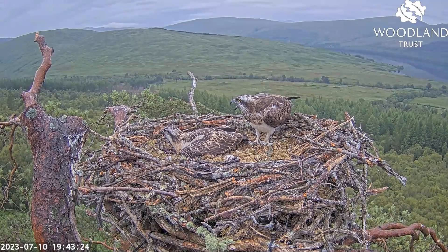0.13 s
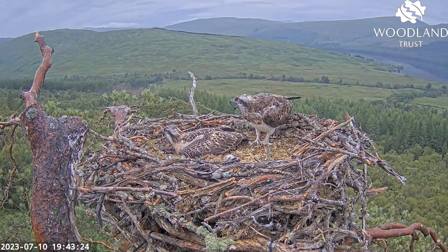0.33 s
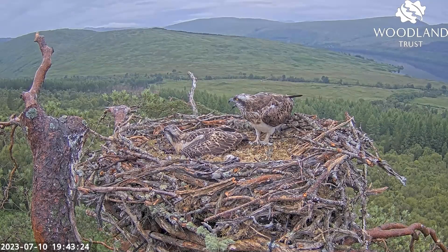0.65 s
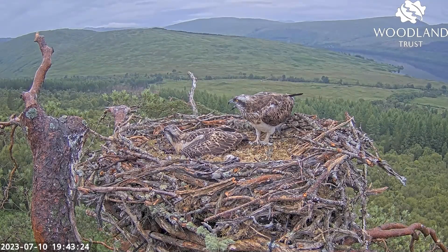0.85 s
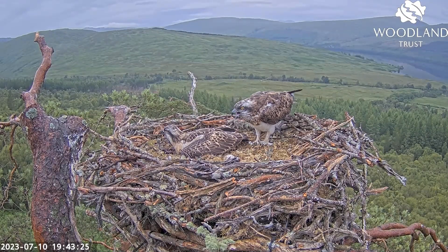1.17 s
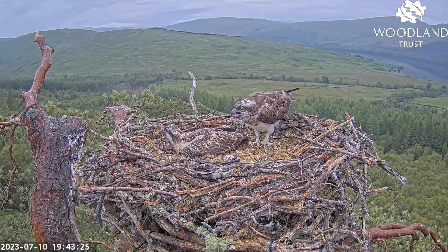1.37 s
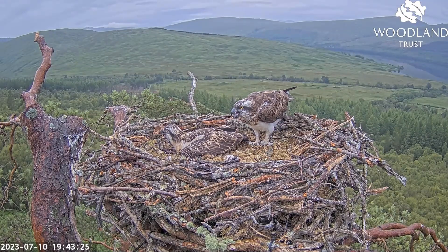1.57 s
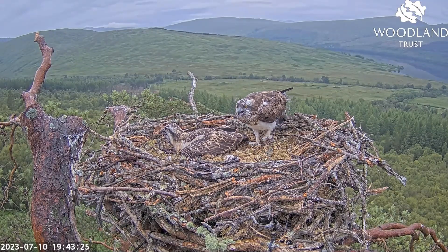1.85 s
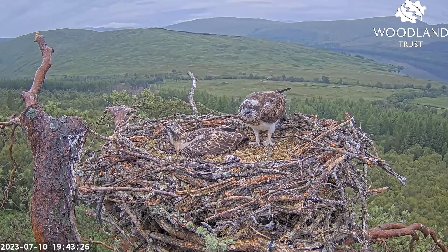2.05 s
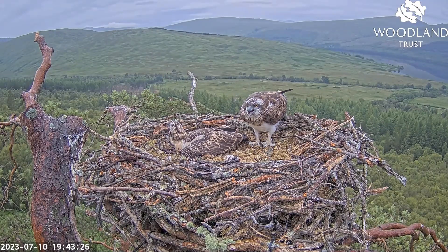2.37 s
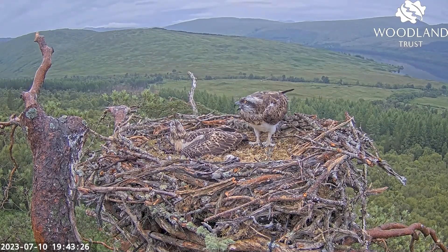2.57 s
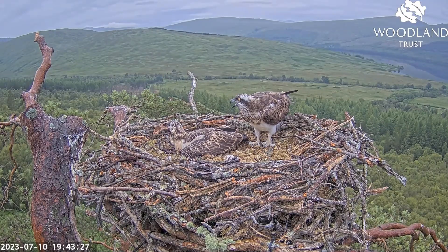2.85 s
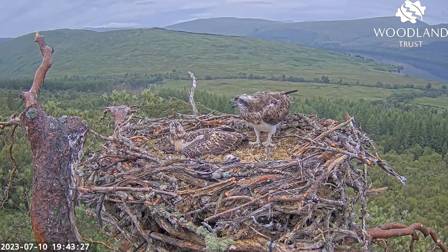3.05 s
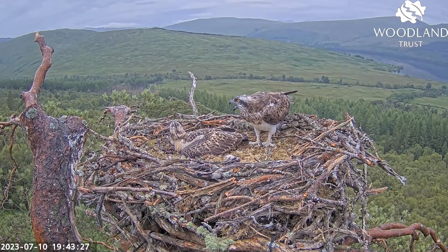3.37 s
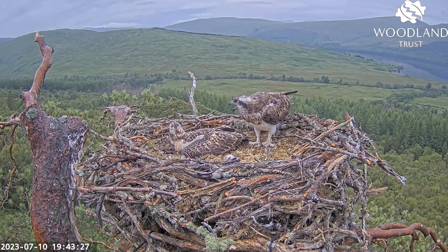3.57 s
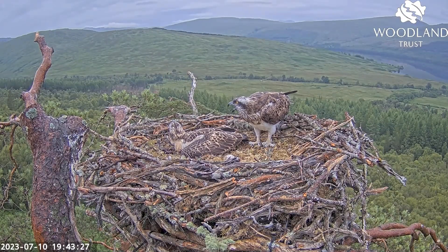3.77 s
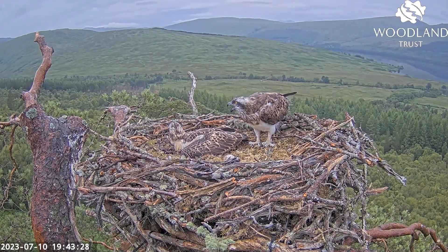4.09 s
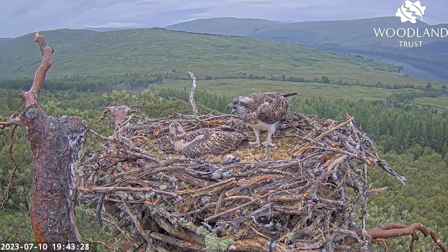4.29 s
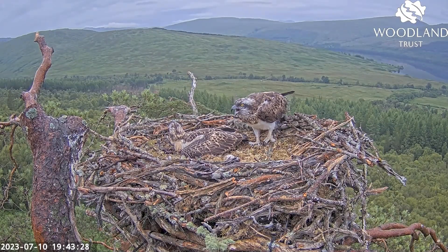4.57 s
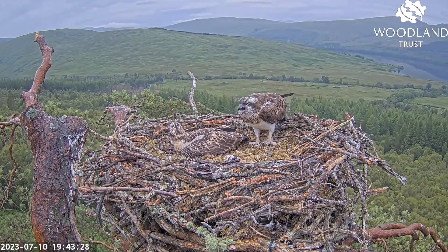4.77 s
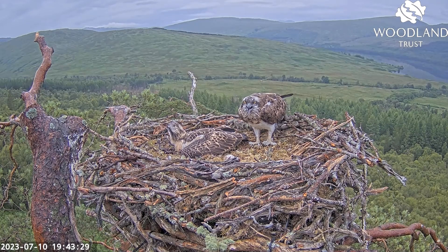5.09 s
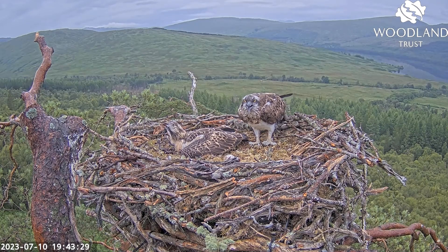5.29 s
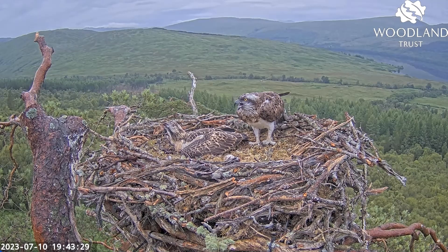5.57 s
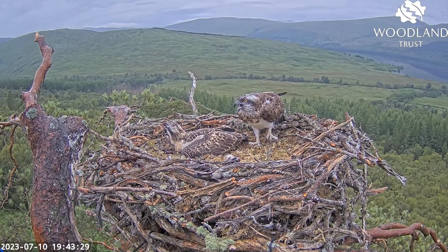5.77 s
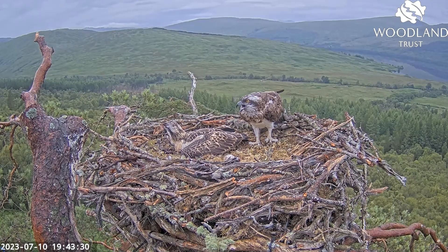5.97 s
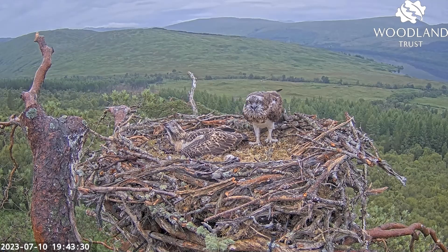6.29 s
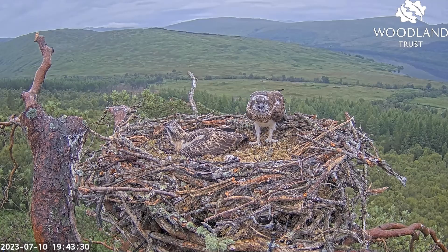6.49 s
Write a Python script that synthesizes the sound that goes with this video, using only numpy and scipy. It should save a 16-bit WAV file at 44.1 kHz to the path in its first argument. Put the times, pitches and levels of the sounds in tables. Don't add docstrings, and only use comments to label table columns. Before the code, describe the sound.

An osprey standing on a big stick nest calls throughout, a fast even series of short, hoarse, whistled chirps, about five per second. They start moderate, swell and rise, drop back softer and lower around the middle, then return louder and higher. Very quiet breeze and faint hiss lie beneath. Close, mostly dry outdoor sound through a slightly boxy, band-limited nest microphone.

```python
import sys
import numpy as np
from scipy import signal
from scipy.fft import rfft, irfft
from scipy.io import wavfile
from scipy.ndimage import uniform_filter1d, minimum_filter1d

SR = 44100
rng = np.random.default_rng(int(sys.argv[2]) if len(sys.argv) > 2 else 0)


def ratio_of_db(decibels):
    return 10 ** (np.asarray(decibels, float) / 20)


def int16_out(signal):
    q = np.round(np.clip(np.atleast_2d(signal).T, -1, 1) * 32767)
    wavfile.write(sys.argv[1], SR, q.astype(np.int16))


N = 292824


def rms_one(x):
    return x / np.sqrt(np.mean(x ** 2) + 1e-20)


def at_hz(points, hz):
    points = np.array(points)
    return np.interp(np.log(hz), np.log(points[:, 0]), points[:, 1])


def drift(hz):
    r = np.exp(-2 * np.pi * hz / SR)
    return rms_one(signal.lfilter([1], [1, -2 * r, r * r], rng.standard_normal(N)))


def span(start_s, end_s):
    part = slice(max(int(start_s * SR), 0), min(int(end_s * SR), N))
    return part, np.arange(part.start, max(part.stop, part.start)) / SR


def resonate(x, modes):
    out = 0
    for k, (hz, width_hz, level_db) in enumerate(modes):
        r = np.exp(-np.pi * 1.5 * width_hz / SR)
        section = [1, 0, -1, 1, -2 * r * np.cos(2 * np.pi * hz / SR), r * r]
        ring = rms_one(signal.sosfilt([section, section], x))
        out = out + (-1) ** k * ratio_of_db(level_db) * ring
    return rms_one(out)


# frequency in Hz, density in dB per Hz.
BREEZE_SPECTRUM = [(30, -32.5), (120, -6), (400, -7), (750, -6.5), (1100, 1.5), (1500, -5), (2500, -0.5),
                   (4000, -9), (8000, -14.5), (10000, -29)]


def breeze():
    colour = ratio_of_db(at_hz(BREEZE_SPECTRUM, np.arange(1, N // 2 + 2) * SR / N))
    noise = irfft(rfft(rng.standard_normal(N)) * colour, N)
    return ratio_of_db(-54.5 + .5 * drift(1.1)) * rms_one(noise)


def scatter(x, t60_s, delay_s):
    t = np.arange(int(.6 * SR)) / SR
    tail = rng.standard_normal(len(t)) * ratio_of_db(-60 * t / t60_s) * (t > delay_s)
    return signal.fftconvolve(x, tail / np.sqrt(np.sum(tail ** 2)))[:N]


def snap():
    t = np.arange(N) / SR - 5
    bell = np.exp(-.5 * (t / 0.00079) ** 2)
    return ratio_of_db(-26) * bell * np.sin(2 * np.pi * 3600 * t)


# start in seconds, length in seconds, jump to the high voice
# in seconds after start, top pitch in Hz, effort in dB.
SWELLING_CHIRPS = [(0.019, 0.1, 0.024, 3670, -32), (0.202, 0.097, 0.023, 3670, -33),
                   (0.385, 0.11, 0.023, 3630, -32), (0.577, 0.1, .017, 3650, -32),
                   (0.769, 0.11, 0.02, 3620, -30.5), (0.957, 0.11, 0.022, 3688, -32),
                   (1.149, 0.11, 0.023, 3750, -29), (1.344, 0.1, 0.02, 3813, -27.5),
                   (1.544, .110, 0.023, 3820, -27), (1.743, 0.11, 0.027, 3874, -28.5),
                   (1.943, 0.109, 0.03, 3892, -26), (2.141, 0.11, 0.032, 3878, -27.5),
                   (2.339, 0.11, 0.023, 3909, -27.5), (2.558, 0.11, 0.034, 3792, -29),
                   (2.776, 0.11, 0.018, 3707, -28.5)]
SUBDUED_CHIRPS = [
    (2.986, 0.12, .030, 3585, -35),
    (3.179, .120, .018, 3555, -33),
    (3.374, .120, 0.028, 3600, -33.5),
    (3.575, 0.11, .020, 3610, -32.5),
    (3.778, .120, 0.017, 3633, -33.5),
    (3.975, .120, .017, 3636, -33.5),
    (4.175, 0.12, .017, 3680, -31),
]
URGENT_CHIRPS = [(4.375, .120, 0.026, 3784, -29.5), (4.570, .128, .021, 3900, -27.5),
                 (4.774, 0.12, .024, 3944, -27.5), (4.981, 0.1, .023, 4079, -26.5),
                 (5.189, 0.1, 0.028, 4063, -24.5), (5.410, .113, 0.039, 3974, -25.5),
                 (5.623, 0.12, .029, 3868, -27), (5.825, 0.11, 0.022, 3870, -25),
                 (6.021, 0.11, 0.028, 3853, -27.5), (6.223, 0.12, .023, 3898, -25),
                 (6.426, 0.12, 0.021, 4111, -26.5), (6.630, .120, .023, 3996, -29.5)]
CHIRPS = SWELLING_CHIRPS + SUBDUED_CHIRPS + URGENT_CHIRPS
USUAL_HZ, USUAL_DB = 3800, -28
GRIP, GAPE, PUSH, SLACK = 1, 2, 3, 4

# time in seconds, grip of the high voice in dB, gape of the beak in dB,
# push of the low voice in dB, slack of the pitch as a factor.
BIRD_STATE = [(0, -11.5, -0.5, 2, .9), (0.45, -9, -1, 0, 1.0), (0.85, -8, 0, -0.5, .8),
              (1.0, -9, -0.5, -1, .9), (1.2, 6.5, 1.5, 1, .6), (1.8, -4, 2.5, 2.5, 1.2),
              (2.2, 6, 4.5, -1.5, .9), (2.6, 3.5, 3, -3.5, 1.2), (2.8, -5, -1, 3.5, 1.1),
              (3.2, -22.5, -0.5, 0.5, .8), (4.25, -19.5, -0.5, 1, .7), (4.4, 1.5, 2.5, 4, 1.0),
              (5.0, -9, 5.5, 4.5, .5), (5.45, -5, 2.5, -2, 1.0), (5.7, -1.5, -1.5, -2, .9),
              (5.95, -4, 0.5, 1.5, 0.64), (6.25, 4.5, 1, 1.5, 1.2), (6.6, -4.5, 2.5, -5, .9)]


def state(column):
    table = np.transpose(BIRD_STATE)
    chirp_s = np.transpose(CHIRPS)[0] + .04
    return np.interp(chirp_s, table[0], table[column])


def openings():
    start_s, _, jump_s, hz, _ = np.transpose(CHIRPS)
    top_hz = 0.778 * hz + 5500 * (jump_s - .022)
    first_db = -19 - 19.5 * np.abs(hz - 3798) / 1e3 + state(PUSH)
    octave_db = -27 + 28 * (hz - USUAL_HZ) / 1e3 + state(GAPE)
    return np.transpose([start_s, start_s + jump_s, 0.71 * hz, top_hz, first_db, octave_db])


# start in seconds, level in dB.
CLOSING_WHISTLES = [(1.419, -35.5), (1.634, -22), (1.832, -23), (2.035, -28.5), (2.239, -26.5),
                    (2.428, -29), (2.660, -25), (2.868, -22.5), (3.094, -32.5), (3.285, -36.5),
                    (3.479, -37), (4.480, -33), (4.684, -23.5), (4.881, -27), (5.074, -23), (5.279, -26),
                    (5.512, -22.5), (5.724, -24.5), (5.925, -24.5), (6.333, -30), (6.532, -32.5)]


def closings():
    start_s, length_s, _, hz, _ = np.transpose(CHIRPS)
    s, db = np.transpose(CLOSING_WHISTLES)
    own = np.searchsorted(start_s, s) - 1
    over_db = db + 25
    from_hz = (0.755 + .004 * over_db) * hz[own]
    octave_db = -35 + 1.25 * over_db + 40 * (hz[own] - USUAL_HZ) / 1e3
    end_s = start_s[own] + length_s[own] - .0015
    return np.transpose([s, end_s, from_hz, 0.685 * hz[own], db, octave_db])


# share of the note, sag under top pitch as a share, fundamental in dB,
# share of the grip heard, octave in dB.
HIGH_ARCH = [(0, 0.036, -35.5, 0.5, -34.5), (.3, 0.054, -33, 0.95, -39.5), (.55, 0.018, -33, .4, -38.5),
             (.78, .001, -34.5, 0.026, -34), (1, 0.055, -39, 0.51, -40)]


def middles():
    along, sag, first_db, by_grip, octave_db = np.transpose(HIGH_ARCH)
    out, controls = [], np.transpose([state(GRIP), state(GAPE), state(SLACK)])
    for (start, length, jump, hz, effort_db), (grip_db, gape_db, slack) in zip(CHIRPS, controls):
        yields = [s - .0015 for s, db in CLOSING_WHISTLES if s > start and db > -33]
        note_s = min([start + length - .011] + yields) - start - jump
        pitch_hz = hz * (1 - sag * (slack + 2 * (note_s - 0.079)))
        bright_db = effort_db - USUAL_DB + .6 * gape_db
        rows = [start + jump + along * note_s, pitch_hz, first_db + by_grip * grip_db, octave_db + bright_db]
        out.append(np.transpose(rows))
    return out


def rasps():
    start_s, length_s, _, _, db = np.transpose(CHIRPS)
    lead_db = -39.5 + 1.1 * (db - USUAL_DB)
    return np.transpose([start_s + length_s, lead_db, db, db - 5, db - 11.5 + state(GAPE)])


def lead_in():
    out, wobble = np.zeros(N), drift(130)
    for opening, row in zip(openings(), rasps()):
        part, t = span(opening[0] - .032, opening[0] + .004)
        t = t - opening[0]
        hz = np.interp(t, [-.032, -.012, .002], [2000, 2150, .92 * opening[2]]) * (1 + 0.013 * wobble[part])
        swell_db = np.interp(t, [-0.019, -.025, -0.0031, -.002, .004], [-28, 1.5, -0.5, 6.5, -10])
        level_db = row[1] + swell_db + 5.5 * wobble[part]
        out[part] += ratio_of_db(level_db) * np.sin(2 * np.pi * np.cumsum(hz) / SR)
    return out


# frequency in Hz, gain in dB.
LOW_VOICE_OUTLET = [(1200, -18), (4300, -13.5), (6500, 1.5), (8200, -1.5), (8650, -9.5), (9200, -14),
                    (10000, -30)]


def low_voice(rows, shape, bend, half_db, third_db):
    out, waver, flutter = np.zeros(N), drift(100), drift(160)
    along, shape_db = np.transpose(shape)
    for start, end, start_hz, end_hz, first_db, octave_db in rows:
        part, t = span(start + along[0] * (end - start), start + along[-1] * (end - start))
        u = (t - start) / (end - start)
        glide_hz = start_hz + (end_hz - start_hz) * (u + bend * u * (1 - u))
        hz = glide_hz * (1 + 0.0032 * waver[part])
        phase = 2 * np.pi * np.cumsum(hz) / SR
        tone = ratio_of_db(first_db) * np.sin(phase)
        tone += ratio_of_db(octave_db + 0.82 * flutter[part]) * np.sin(2 * phase)
        tone += ratio_of_db(octave_db + third_db - 11.0 * u + at_hz(LOW_VOICE_OUTLET, 3 * hz)) * np.sin(3 * phase)
        for half in (.5, 1.5, 2.5):
            line_db = octave_db + half_db + at_hz(LOW_VOICE_OUTLET, half * hz) + 7.05 * waver[part]
            tone += ratio_of_db(line_db) * np.sin(half * phase)
        out[part] += np.sqrt(2) * tone * ratio_of_db(np.interp(u, along, shape_db) + 2.08 * flutter[part])
    return out


def high_phase():
    points = []
    for rows in middles():
        points += [tuple(row[:2]) for row in rows]
        points.append((rows[-1][0] + 0.034, 0.85 * rows[-1][1]))
    s, hz = np.transpose(sorted(points, key=lambda point: point[0]))
    pitch_hz = np.interp(np.arange(N) / SR, s, hz) * (1 + 0.0037 * drift(110))
    return 2 * np.pi * np.cumsum(pitch_hz) / SR


def high_voice(phase):
    out, flutter, shimmer = np.zeros(N), drift(140), drift(190)
    for rows in middles():
        s, _, first_db, octave_db = np.transpose(rows)
        part, t = span(s[0] - .008, s[-1] + 0.01)
        edge_db = np.interp(t, [s[0] - .008, s[0], s[-1], s[-1] + 0.028], [-35.0, 3.5, 3, -34.0])
        tone = ratio_of_db(np.interp(t, s, first_db) + 3.6 * flutter[part]) * np.sin(phase[part])
        tone += ratio_of_db(np.interp(t, s, octave_db) + 2.2 * shimmer[part]) * np.sin(2 * phase[part])
        out[part] += np.sqrt(2) * tone * ratio_of_db(edge_db)
    return out


# frequency in Hz, width in Hz, level in dB.
THROAT_MODES = [(1192, 244, -23.5), (2234, 217, -2), (2856, 360, -6.5)]
# frequency in Hz, width in Hz, level in dB.
BEAK_MODES = [(4433, 260, -1), (5980, 880, 0.5), (7130, 150, -7.5), (9140, 240, -7.5)]
# multiple of high voice, multiple of throat note, level in dB.
MIXED_TONES = [(0, 2, -15), (2, -1, -13), (1, 1, -9.5), (0, 3, -10.5), (3, -2, -10), (1, 2, -12.5),
               (0, 4, -15.5)]


def rasp(high):
    air = rng.standard_normal(N) * ratio_of_db(1.7 * drift(100))
    waver, out = drift(70), np.zeros(N)
    knots = [ratio_of_db(7.24 * drift(89)) for _ in range(len(MIXED_TONES) + 1)]
    for opening, middle, (end, _, early_db, late_db, over_db) in zip(openings(), middles(), rasps()):
        start, jump = opening[:2]
        times = [start - .002, start + 0.0068, jump, jump + 0.019, end - .035, end - .01, end + 0.0021]
        part, t = span(times[0], times[-1])
        stretch = (middle[:, 1].max() / 3800) ** 0.66
        low = 2 * np.pi * np.cumsum(2183 * stretch * (1 + .012 * waver[part])) / SR
        throat = resonate(air[part], np.array(THROAT_MODES) * [stretch, 1, 1])
        throat = throat + ratio_of_db(-6) * knots[-1][part] * np.sin(low)
        beak = ratio_of_db(-1.5) * resonate(air[part], BEAK_MODES)
        for (m, n, db), knot in zip(MIXED_TONES, knots):
            beak = beak + ratio_of_db(db) * knot[part] * np.sin(round(m) * high[part] + round(n) * low)
        throat_db = early_db + np.array([-27.5, -5.5, 3, -3.0, 1.5, -5.5, -15.0])
        throat_db[4:] += late_db - early_db
        beak_db = over_db + np.array([-22.5, -1.5, 7.0, 4.0, 3.0, -5, -32.5])
        out[part] += rms_one(throat) * ratio_of_db(np.interp(t, times, throat_db))
        out[part] += rms_one(beak) * ratio_of_db(np.interp(t, times, beak_db))
    return out


def scene():
    # (share of whistle, dB)
    rise = [(-.2, -41.5), (0, -4), (.2, -3.5), (.75, -3), (1, -10), (1.3, -33.5)]
    fall = [(-.3, -33.5), (0, -1), (.25, -3.5), (.6, 0), (1, -3), (1.6, -46.5)]
    bird = low_voice(openings(), rise, bend=0.19, half_db=-13, third_db=1.5)
    bird += low_voice(closings(), fall, bend=.05, half_db=-26.0, third_db=1)
    high = high_phase()
    bird += high_voice(high) + rasp(high) + lead_in() + snap()
    nest = ratio_of_db(-5.5) * scatter(bird, t60_s=0.032, delay_s=0.00067)
    valley = ratio_of_db(-37) * scatter(bird, t60_s=0.25, delay_s=0.019)
    return (bird + nest + valley + breeze())[None]


# frequency in Hz, width in Hz, gain left as a factor.
HOUSING_DIPS = [(1665, 500, 0.55), (2423, 60, 0.49), (3123, 690, 0.86), (4720, 285, 0.22),
                (6390, 520, 0.058), (8500, 440, 0.067)]


def housing(x):
    for hz, width_hz, left in HOUSING_DIPS:
        pole, zero = np.exp(-np.pi * width_hz * np.array([1, np.clip(left, .05, 1)]) / SR)
        turn = -2 * np.cos(2 * np.pi * hz / SR)
        x = signal.lfilter([1, turn * zero, zero ** 2], [1, turn * pole, pole ** 2], x)
    return x


def thin_bands(x, quiet_db, follow, sparse_db, above_hz):
    hz, _, frames = signal.stft(x, SR, nperseg=2304, scaling="psd")
    power = np.abs(frames) ** 2 + 1e-20
    mask = ratio_of_db(2 * quiet_db) * (power.mean(axis=1, keepdims=True) / ratio_of_db(2 * -102)) ** follow
    kept = 1 / (1 + (mask / uniform_filter1d(power, size=11, axis=1)) ** 4)
    kept /= 1 + (ratio_of_db(2 * sparse_db) * uniform_filter1d(power, size=27, axis=1) / power) ** 4
    gain = np.where(hz[:, None] > above_hz, kept, 1)
    return signal.istft(frames * gain, SR, nperseg=2304, scaling="psd")[1][:, :N]


def duck_before_attacks(x, margin_db, ahead_s, above_hz):
    high = signal.sosfiltfilt(signal.butter(4, above_hz, "high", fs=SR, output="sos"), x)
    power = uniform_filter1d(high ** 2, size=90) + 1e-14
    coming = -minimum_filter1d(-power, size=int(ahead_s * SR), origin=-int(ahead_s * SR / 2))
    kept = np.minimum(ratio_of_db(margin_db) * np.sqrt(power / coming), 1) ** 2
    return x - high * (1 - kept)


def low_pass(x):
    return signal.sosfilt(signal.butter(12, 10560, fs=SR, output="sos"), x)


def record(dry):
    sent = thin_bands(housing(dry), quiet_db=-107, follow=0.076, sparse_db=-3.5, above_hz=2900)
    ducked = duck_before_attacks(sent, margin_db=17.5, ahead_s=.016, above_hz=3000)
    top_cut = signal.cheby2(8, 50, 11130, fs=SR, output="sos")
    return low_pass(signal.sosfilt(top_cut, ducked))


dry = scene()
out = record(dry)
int16_out(out)
```